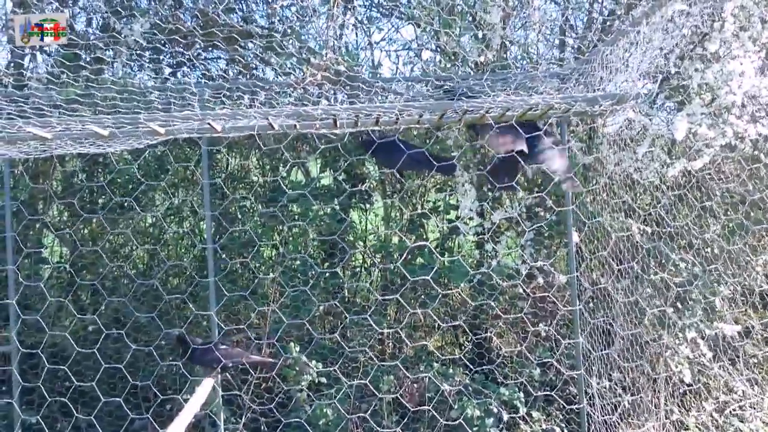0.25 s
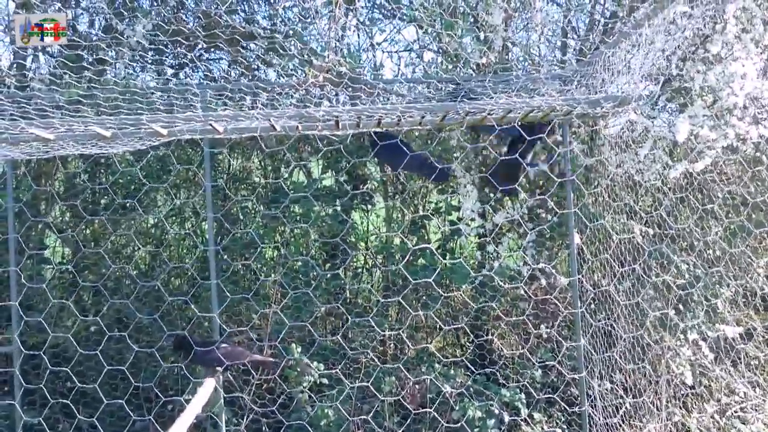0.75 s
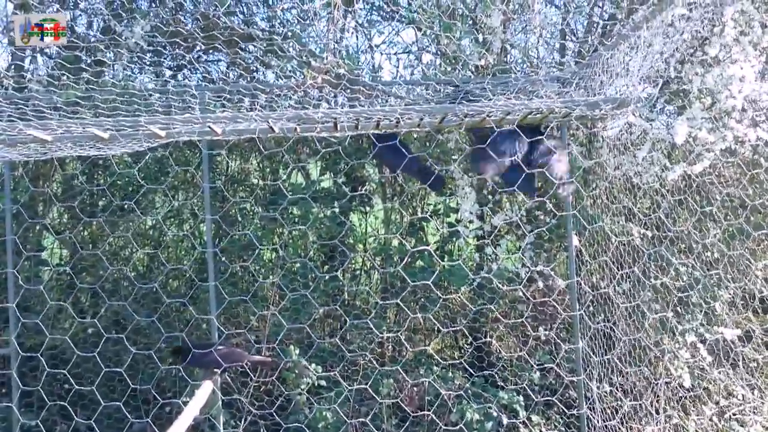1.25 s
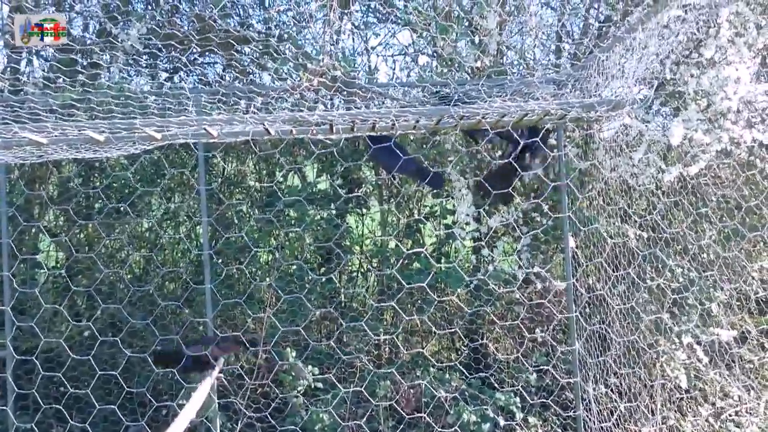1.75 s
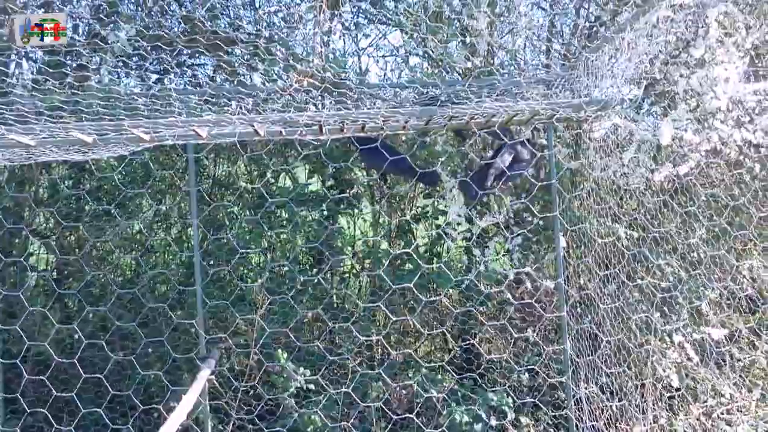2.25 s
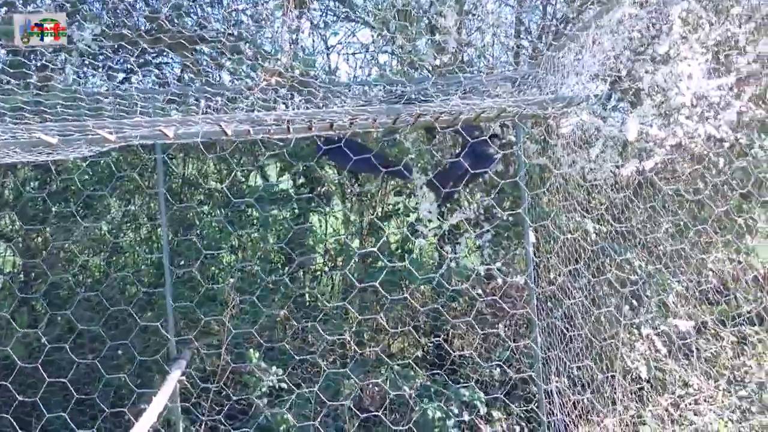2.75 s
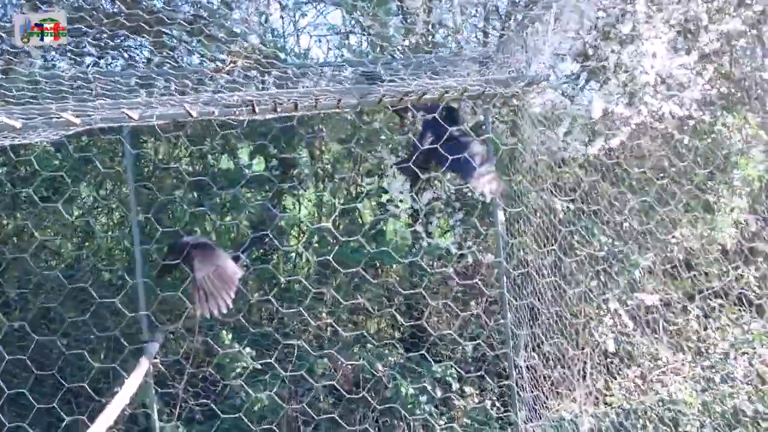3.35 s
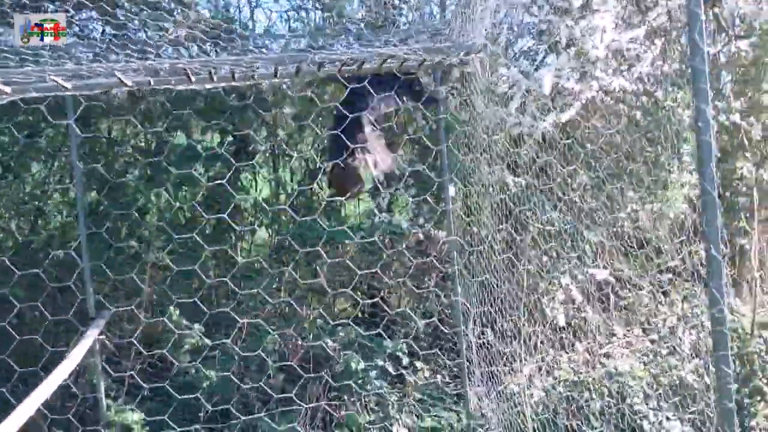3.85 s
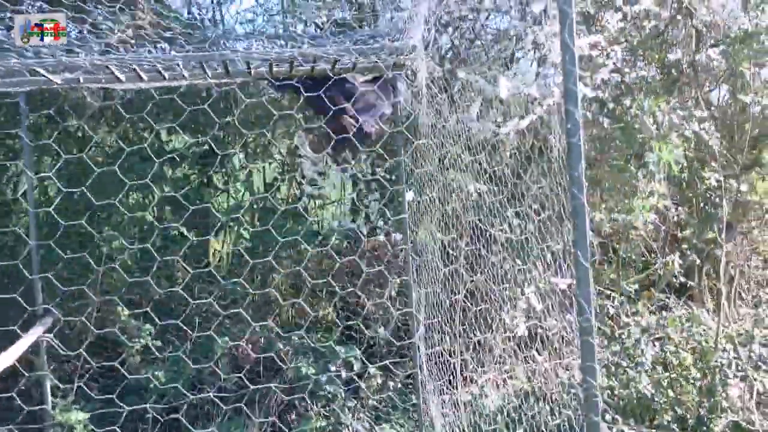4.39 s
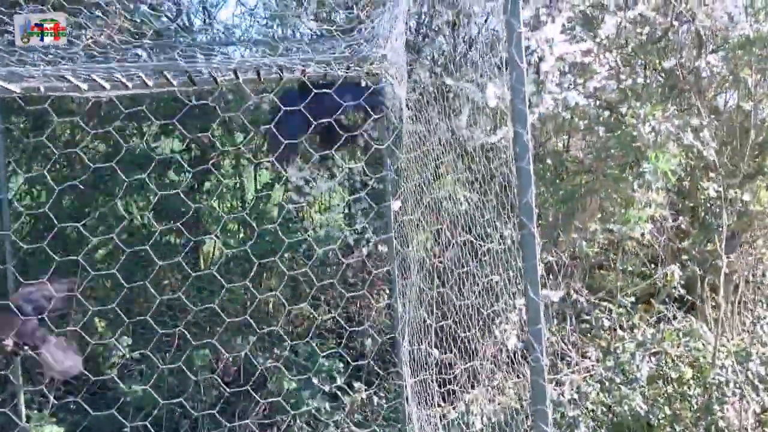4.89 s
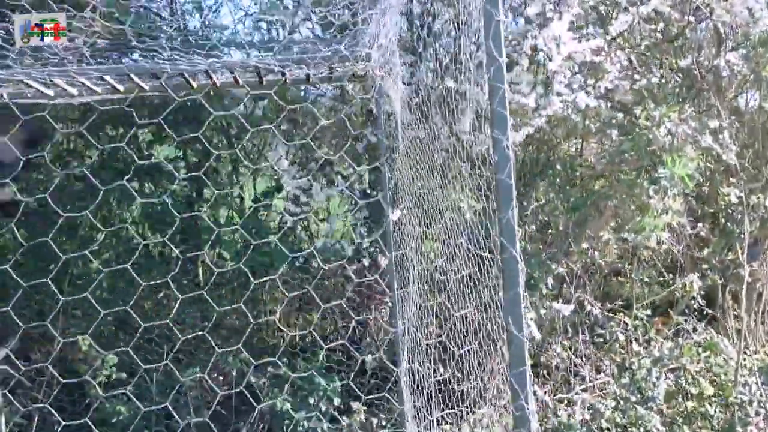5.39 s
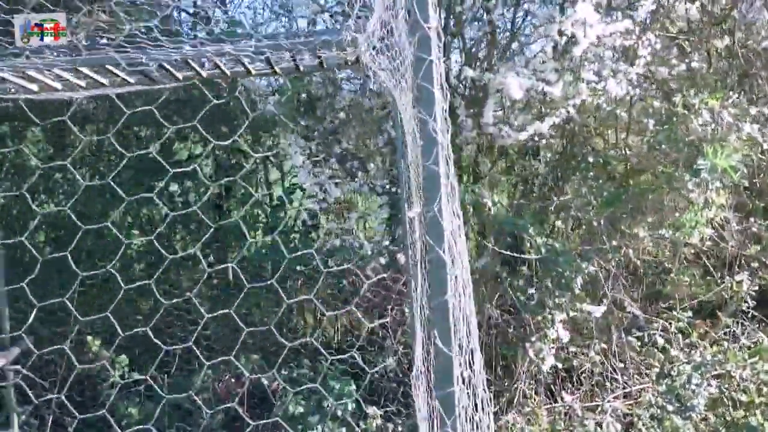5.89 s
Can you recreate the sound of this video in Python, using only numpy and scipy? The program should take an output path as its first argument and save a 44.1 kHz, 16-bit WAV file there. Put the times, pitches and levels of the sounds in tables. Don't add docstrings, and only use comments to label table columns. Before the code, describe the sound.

Outdoors beside a field, crows beat their wings against a wire cage. At first dry, feathery strokes come softly from a bird clinging to the mesh, with small ticks and a thin ping. After a near lull, birds flutter up close with loud swishes, cracks, knocks and ringing wire, peaking late before easing. Stereo microphone, faint leaf hiss and low wind buffets mostly on the right.

```python
import sys
import numpy as np
from scipy import signal
from scipy.fft import rfft, irfft
from scipy.io import wavfile

SR = 44100
rng = np.random.default_rng(int(sys.argv[2]) if len(sys.argv) > 2 else 0)


def ratio_of_db(decibels):
    return 10 ** (np.asarray(decibels, float) / 20)


def file_out(sig):
    cols = np.atleast_2d(sig).T
    lim = np.clip(cols, -1, 1)
    pcm = np.round(lim * 32767).astype(np.int16)
    wavfile.write(sys.argv[1], SR, pcm)


N = 270333

# f/Hz, level/dB per Hz
LEFT_PORT = [(130, -88.5), (340, -88.5), (500, -86.5), (620, -86), (830, -81), (1300, -88), (2200, -86),
             (3600, -81.5), (4650, -87), (6000, -75.5), (8500, -79), (10000, -82.5), (11300, -94),
             (15800, -99.7)]
RIGHT_PORT = [(130, -88), (340, -82.5), (500, -82), (640, -80.5), (860, -76.5), (1300, -79), (2200, -78),
              (3600, -72), (4650, -80.5), (6000, -85), (8500, -86.5), (10000, -95), (11300, -95.5),
              (15800, -88.5)]
PORT_LAG_S = .00022
POLARITY = np.array([[1.], [-1.]])
WIND_SIDES_DB = np.array([[-9], [5]])
SPLIT_HZ = 1750


def rms_one(x):
    return x / np.sqrt(np.mean(x ** 2) + 1e-20)


def pan_gain(db, left_right_db):
    return ratio_of_db(db + left_right_db * np.array([[.5], [-.5]]))


def cut(x, hz, kind, order):
    return signal.sosfilt(signal.butter(order, hz, kind, fs=SR, output="sos"), x)


def at_hz(points, hz):
    points = np.array(points)
    return np.interp(np.log(hz + 1), np.log(points[:, 0]), points[:, 1])


def colour(x, left, right):
    hz = np.arange(2049) * SR / 4096
    cepstrum = irfft(np.log(ratio_of_db(np.array([at_hz(left, hz), at_hz(right, hz)]))))
    cepstrum[:, 1:2048] *= 2
    cepstrum[:, 2049:] = 0
    response = irfft(np.exp(rfft(cepstrum)))[(None,) * (x.ndim - 2)]
    return signal.fftconvolve(x, response, axes=-1)[..., :x.shape[-1]]


def drift(rate):
    r = np.exp(-2 * np.pi * rate / SR)
    return rms_one(signal.lfilter([1], [1, -2 * r, r * r], rng.standard_normal(N + SR))[SR:])


def ring(clicks, hz, t60):
    r, w = ratio_of_db(-60 / (t60 * SR)), 2 * np.pi * hz / SR
    return signal.lfilter([0, np.sin(w)], [1, -2 * r * np.cos(w), r * r], clicks + 1e-18)


def wings(squareness, bed_top_db):
    # t/s, level/dB
    scrabble = [(0, -63), (.78, -72.5), (1.19, -62.5), (1.59, -61.5), (1.74, -64.5), (2.15, -65),
                (2.36, -74), (3.16, -79.5), (3.45, -53.5), (3.84, -49), (4.66, -50), (4.81, -45),
                (4.92, -48), (5.2, -50), (5.34, -42), (5.48, -78), (5.82, -52), (6.13, -52)]
    # t/s, swish level/dB, length/s, low flap against the swish/dB
    far_beats = [(0, -48, 0.026, -10), (0.074, -64, 0.03, 3.5), (0.178, -52.5, 0.054, -8),
                 (.374, -51, 0.052, -7), (0.593, -58, 0.036, -5.5), (0.779, -53.5, 0.052, -9.5),
                 (0.947, -48.5, 0.052, -11.5), (0.971, -48.5, 0.038, -9), (1.06, -62.5, .045, -4),
                 (1.143, -47, 0.062, -10), (1.307, -51, 0.1, -6.5), (1.355, -45.5, 0.066, -10.5),
                 (1.575, -50.5, 0.043, -7), (1.74, -54, 0.045, -24), (1.788, -56.5, 0.061, -4.5),
                 (1.96, -65, 0.072, 4.5), (2.019, -51, 0.072, -3.5), (2.22, -48.5, 0.013, -2),
                 (2.327, -71, 0.028, 3), (2.436, -62, .02, -11), (2.633, -60, 0.046, -4),
                 (2.744, -66.5, .047, -0.5)]
    near_beats = [(3.486, -49, 0.039, -0.5), (3.642, -43, 0.06, -3.5), (3.753, -48, 0.013, 8.5),
                  (3.765, -35.5, 0.015, -3), (3.788, -36, 0.038, -9), (3.805, -38, 0.024, -7),
                  (4.074, -53.5, 0.13, -29), (4.155, -47.5, 0.056, -23), (4.308, -41.5, 0.082, -5),
                  (4.415, -52, 0.075, -8), (4.462, -37, 0.011, -13), (4.638, -45, 0.013, -20),
                  (4.466, -42, 0.059, -10.5), (4.742, -35.5, 0.088, -5), (4.741, -34.5, .012, -11),
                  (4.756, -35.5, 0.021, -2), (4.814, -39.5, 0.012, -6), (4.821, -41.5, 0.052, -8),
                  (4.889, -41.5, .018, -8), (4.907, -42, 0.056, -4.5), (4.962, -41.5, 0.023, -2.5),
                  (5.005, -47, 0.14, -2.5), (5.772, -45, 0.2, -7), (6.06, -48, 0.13, -25),
                  (6.123, -55, 0.016, 4)]
    slaps = [(0.468, -61.5, 0.045, -1.5), (0.925, -52.5, 0.024, -2), (2.183, -50.5, 0.075, -4),
             (2.53, -63.5, 0.077, -1), (3.169, -63, 0.11, -9), (4.585, -47.5, 0.13, -8.5),
             (5.123, -49.5, 0.096, -2.5), (5.317, -41.5, 0.072, -28), (5.419, -39.5, 0.071, -6.5),
             (5.488, -47, 0.045, -1.5), (5.551, -42.5, 0.17, -4), (5.688, -50, 0.1, 2.5),
             (5.97, -62.5, 0.18, 3)]
    bangs = [
        (3.757, -37.5, 0.023, -3),
        (3.949, -37.5, 0.027, -8.5),
        (4.861, -40.5, 0.022, -2.5),
        (4.399, -48.5, .012, 0),
        (4.948, -50, .015, -4),
        (5.2942, -30.5, 0.021, -12),
        (5.3793, -34, 0.025, -8.5),
    ]
    t = np.arange(0, N, 32) / SR
    strokes = np.concatenate([far_beats, near_beats, slaps, bangs])
    s, peak_db, length, flap_db = np.transpose(strokes)[:, :, None]
    kinds = [[.48, .21, .06], [1.6, 1.7, 1.5]]
    counts = [len(far_beats) + len(near_beats), len(slaps), len(bangs)]
    swell, end = np.repeat(kinds, counts, axis=1)[:, :, None]
    side = np.where(t < s, swell * length, (1 - swell) * length)
    distance = np.abs((t - s) / np.maximum(side, .0012))
    bump = ratio_of_db(peak_db - 11.5 * distance ** np.where(t < s, squareness, end)) ** 2
    bed_db = np.interp(np.arange(N) / SR, *np.transpose(scrabble))

    def level(power, floor_db):
        return np.sqrt(np.interp(np.arange(N) / SR, t, power.sum(0)) + ratio_of_db(floor_db) ** 2)

    flap, swish, top = feathers(per_s=10000, spread_db=3.0, cycles=9.5, hiss=.42, patchy_db=2.4)
    flap = flap * level(bump * ratio_of_db(flap_db) ** 2, bed_db - 6.5)
    swish_level = level(bump, bed_db - 2.5)
    return flap + swish * swish_level + top * level(bump, bed_db + bed_top_db), swish_level


def feathers(per_s, spread_db, cycles, hiss, patchy_db):
    lag_spread_s, top_hz, pitch_count = .00013, 10600, 64
    chance = rng.random((N, 2))
    lag = (PORT_LAG_S + lag_spread_s * rng.standard_normal(N)) * SR
    lag = np.clip(lag, -40, 60).astype(int)
    sizes = ratio_of_db(spread_db * np.minimum(rng.exponential(1, N), 3)) * rng.choice([-1, 1], N)
    born = np.flatnonzero(chance[100:-100, 0] < per_s / SR) + 100
    pitch_of = (chance[born, 1] * pitch_count).astype(int)
    pitches = np.geomspace(200, 15500, pitch_count) * rng.uniform(.98, 1.02, pitch_count)
    patches = [ratio_of_db(patchy_db * drift(25.0)) for _ in range(8)]
    barbs = np.zeros((2, N))
    for k, hz in enumerate(pitches):
        at, clicks = born[pitch_of == k], np.zeros((2, N))
        clicks[0, at] = sizes[at] * patches[k // 8][at]
        clicks[1, at + lag[at]] = -clicks[0, at]
        barbs += ring(clicks, hz, cycles * hz ** -.75) * hz ** 0.78
    air = rng.standard_normal((2, N))
    shared = cut(air[0], 2440, "low", order=2)
    air[1] = cut(air[1], 1500, "high", order=2) - np.roll(shared, int(PORT_LAG_S * SR))
    both = np.sqrt(1 - hiss) * rms_one(barbs) + np.sqrt(hiss) * air * ratio_of_db(1.8 * drift(88))
    both = colour(both, LEFT_PORT, RIGHT_PORT)
    flap = rms_one(cut(both, SPLIT_HZ, "low", order=3))
    swish = rms_one(cut(both, SPLIT_HZ, "high", order=3))
    return flap, cut(swish, top_hz, "low", order=4), cut(swish, top_hz, "high", order=4)


def ticks(level, per_s, level_db):
    sizes = ratio_of_db(5.6 * np.minimum(rng.exponential(1, N), 3)) * rng.choice([-1, 1], N)
    clicks = (rng.random(N) < per_s / SR) * sizes
    clicks = np.array([clicks, -np.roll(clicks, int(PORT_LAG_S * SR))])
    clicks = cut(colour(clicks, LEFT_PORT, RIGHT_PORT), SPLIT_HZ, "high", order=2)
    return rms_one(clicks) * level * ratio_of_db(level_db)


def wire(taps, level_db, spread, t60_s, share):
    out, t = np.zeros((2, N + 4096)), np.arange(4000) / SR
    noise, lag = rng.standard_normal((len(taps), 2, len(t))), int(PORT_LAG_S * SR)
    for (s, peak_db, hz, pan_db), crack in zip(taps, noise):
        t60 = t60_s * (1000 / hz) ** 0.12
        crack = crack * ratio_of_db(-60 * t / np.maximum(t60 * 1.2, .001)) * np.minimum(t * hz / 0.72, 1)
        contact = crack[0] * (t < 4.0 / hz + .001)
        crack = cut(crack, min(17.0 * hz, 18000), "low", order=1)
        rung = sum(ring(contact, hz * (1 + spread) ** k, t60) * 0.11 ** abs(k) for k in (-1, 0, 1))
        parts = np.array([rung * POLARITY, cut(crack, 510, "high", order=2)])
        rung, crack = [part / np.abs(part).max() for part in colour(parts, LEFT_PORT, RIGHT_PORT)]
        tap = (share * rung + (1 - share) * crack) * pan_gain(peak_db + level_db, pan_db)
        at = round(s * SR)
        out[0, at:at + len(t)] += tap[0]
        out[1, at + lag:at + lag + len(t)] += tap[1]
    return out[:, :N]


def claws():
    # t/s, peak/dB, ring f/Hz, left-right/dB
    cracks = [(.926, -29, 6570, 1), (2.524, -34.5, 3380, 2), (2.628, -35.5, 1630, 1),
              (3.463, -36, 1190, -12), (3.754, -24, 1710, 0), (3.765, -27, 3150, -9),
              (4.081, -26, 910, -3.5), (4.177, -24, 3700, -3.5), (4.407, -26, 3880, -5),
              (4.439, -40, 3340, -6), (4.46, -37, 3560, 12), (4.754, -17, 3700, -12),
              (4.946, -27, 1210, 12), (5.25, -22, 3220, -5), (5.295, -17, 1140, 2.5),
              (5.348, -29, 5850, -1), (5.382, -24, 7100, -14), (5.64, -32, 966, -4), (5.718, -23, 3070, 0),
              (5.765, -23.5, 2980, -4)]
    return wire(cracks, level_db=-5, spread=0.25, t60_s=0.025, share=0.22)


def knocks():
    # t/s, peak/dB, ring f/Hz, left-right/dB
    panel_hits = [(1.564, -37.5, 830, -2.5), (3.481, -34, 1580, -1), (3.6, -30, 1700, -4),
                  (3.694, -39, 1670, -13), (3.878, -27.5, 910, -1.5), (4.21, -34.5, 1160, -12.5),
                  (4.689, -28.5, 903, -4), (4.862, -30, 1610, 11), (3.849, -39, 1000, -2),
                  (3.764, -24, 1500, -2), (4.749, -22, 900, -4), (5.018, -29, 1240, -3),
                  (5.022, -29, 1740, -6), (5.024, -29, 1250, -6), (5.035, -32, 1160, -2),
                  (5.054, -32, 1160, -6), (5.381, -21.5, 1990, 3), (5.533, -25, 886, 0),
                  (5.605, -20.5, 410, 0), (5.619, -22.5, 1310, -4), (5.675, -19, 1175, 6)]
    return wire(panel_hits, level_db=-4, spread=0.19, t60_s=0.031, share=0.53)


def pecks():
    # t/s, peak/dB, ring f/Hz, left-right/dB
    beak_taps = [(.157, -34, 3380, -4), (.754, -42, 2970, -8), (1.052, -37, 3100, -11),
                 (1.118, -33, 6330, 11), (1.721, -35.5, 6000, 10), (1.998, -37, 3420, -1),
                 (3.636, -27, 3900, -12), (3.787, -30, 3300, .5), (3.845, -38, 2980, -4),
                 (3.953, -27, 6300, 13), (3.955, -28, 2520, -4), (4.304, -18.5, 2960, 0),
                 (4.409, -32, 3900, -4), (4.397, -27.5, 3960, -9), (4.568, -22, 3640, 2),
                 (4.705, -26, 3600, -9), (4.725, -14, 2950, -8), (5.119, -32, 3780, -18),
                 (5.789, -29, 3120, -4), (4.713, -26, 3450, -4), (4.738, -19, 3180, -4),
                 (4.761, -22, 3400, -4), (5.932, -26, 2890, 4), (5.978, -30, 3400, -4)]
    return wire(beak_taps, level_db=-7, spread=0.13, t60_s=0.043, share=0.36)


def thumps():
    # t/s, peak/dB, ring f/Hz, left-right/dB
    air_pushes = [(1.794, -62, 278, 4), (2.672, -62, 340, -4), (3.459, -47.5, 380, -3.5),
                  (3.77, -39.5, 327, -2), (3.879, -50.5, 250, -10), (4.017, -53.5, 312, -3),
                  (4.172, -41.5, 450, -2.5), (4.309, -56, 432, -15), (4.751, -64, 354, -8),
                  (5.112, -43.5, 300, -2), (5.291, -60, 278, 18), (5.857, -55.5, 503, -11)]
    return wire(air_pushes, level_db=6.5, spread=0.33, t60_s=0.033, share=0.7)


def booms():
    # t/s, peak/dB, ring f/Hz, left-right/dB
    blows = [
        (.649, -47.5, 1140, 6),
        (2.171, -39.5, 1150, 0),
        (3.599, -36.5, 900, -3),
        (3.604, -33, 1100, -2),
        (5.015, -34, 1000, 2),
        (5.029, -35, 1850, -1.5),
        (5.295, -24, 1042, 1),
    ]
    return wire(blows, level_db=3.5, spread=0.14, t60_s=0.024, share=0.8)


def pings():
    # t/s, peak/dB, ring f/Hz, left-right/dB
    strands = [
        (1.6, -61, 7700, 0),
        (1.733, -32, 4870, 8),
        (1.742, -36, 5400, 8),
        (1.737, -39, 6000, 8),
        (1.75, -36, 5050, -4),
        (3.1675, -49.5, 10500, 18),
        (4.5, -48, 4900, -2),
        (5.803, -46, 6800, 0),
        (6.02, -54, 15000, -3),
    ]
    return wire(strands, level_db=-6.0, spread=0.018, t60_s=0.074, share=0.83)


def snaps(table, t60_s, ring_share):
    out, t = np.zeros((2, N + 2048)), np.arange(1500)
    click = cut(colour((t == 0) * POLARITY, LEFT_PORT, RIGHT_PORT), 750, "high", order=2)
    for s, peak_db, hz, pan_db in table:
        rung = ring(click, hz, t60_s) + ring(click, 1.38 * hz, t60_s)
        body = cut(click + ring_share * np.sqrt(4000 / hz) * rung, .3 * hz, "high", order=2)
        snap = cut(body, min(hz ** 2 / 1450 + 600, 19000), "low", order=3)
        snap = snap / np.abs(snap).max() * pan_gain(peak_db, pan_db)
        for port, lag in enumerate((0, PORT_LAG_S)):
            at = round((s + lag) * SR)
            out[port, at:at + len(t)] += snap[port]
    return out[:, :N]


def claw_slips():
    # t/s, peak/dB, ring f/Hz, left-right/dB
    slips = [(.6485, -38, 7300, 22.5), (.6486, -46, 13000, 10), (5.2947, -31, 13000, 3),
             (5.3495, -30, 13000, 6), (5.3804, -31, 13000, 3), (5.385, -30, 7500, 3),
             (1.7943, -37.5, 3600, -9), (3.483, -35.5, 8900, 19), (3.7649, -23, 6760, 5),
             (4.0817, -38, 8700, 11), (4.7546, -23, 6300, 3), (5.0701, -21.5, 2230, -3.5),
             (5.2945, -18.5, 9400, 7), (5.3494, -20, 8500, 4), (5.3806, -25, 7000, 0),
             (5.385, -24.5, 3540, -9), (5.642, -29.5, 9200, 4), (5.899, -41, 7000, 0)]
    return snaps(slips, t60_s=0.0046, ring_share=0.095)


def quill_catches():
    # t/s, peak/dB, ring f/Hz, left-right/dB
    catches = [(.0762, -43, 3010, -8), (.1613, -46, 2920, 0), (.3756, -38, 2840, 6), (.6776, -48, 3870, 2),
               (.756, -45, 2920, 0), (.923, -44, 3100, 6), (1.1475, -38, 3700, 3), (1.3429, -36, 3530, 3),
               (1.3466, -42, 1470, 6), (1.3735, -34, 2750, -4), (1.5824, -47, 3440, 3),
               (1.7239, -40, 4820, 3), (1.7966, -42, 3350, -3), (2.2044, -39, 6020, 7),
               (2.3251, -47, 8000, 10), (2.528, -46, 1890, 0), (2.7434, -52, 2670, 6),
               (2.984, -49, 7500, 3), (3.0916, -53, 6970, 6), (3.424, -41, 1120, 0), (3.5871, -46, 9030, 3),
               (3.7538, -22, 9100, 7), (3.756, -25, 6000, 2), (3.7573, -26, 5800, 0),
               (3.7683, -31, 3300, 4), (3.7887, -25, 3350, 6), (3.9116, -36, 6620, 3),
               (3.9504, -24, 6190, 3), (4.0862, -31, 2320, -4), (4.1792, -33, 2340, -5),
               (4.2352, -29.5, 6360, 3), (4.2995, -28, 3000, 0), (4.4398, -32, 3180, 3),
               (4.4505, -28, 6620, 0), (4.4615, -34, 5330, 7), (4.5825, -34, 1810, 6),
               (4.7259, -25, 1000, 0), (4.8152, -32, 3400, 3), (4.8643, -30, 6710, 7),
               (4.8865, -29, 8000, 5), (4.8985, -33, 7000, 3), (4.9058, -34, 8000, 5),
               (4.9478, -38, 5760, 0), (5.056, -34, 1300, 5), (5.4922, -31.5, 1470, -3),
               (5.6051, -28, 7570, 13), (5.6738, -33, 7000, 0), (5.7193, -35, 1460, -2),
               (5.9376, -35, 5500, 3), (6.1259, -34, 1630, -3)]
    return snaps(catches, t60_s=0.01, ring_share=0.029)


def squeaks():
    # t/s, peak/dB, f/Hz, length/s, left-right/dB
    slides = [
        (5.811, -43, 5480, 0.037, 6),
        (5.808, -54, 6200, .016, 6),
        (5.828, -54, 5200, 0.019, 11),
        (5.022, -33, 1374, .014, -10),
        (5.417, -45, 6050, .022, 6),
    ]
    out = np.zeros((2, N))
    for s, peak_db, hz, length, pan_db in slides:
        t = np.arange(int(length * SR)) / SR
        waver = .5 * np.sin(2 * np.pi * 90 * t)
        tone = np.sin(2 * np.pi * hz * (t + [[PORT_LAG_S], [0]]) + waver)
        tone = tone * np.sin(np.pi * t / length) ** 2
        at = int((s - length / 2) * SR)
        out[:, at:at + len(t)] += tone * pan_gain(peak_db, pan_db) * POLARITY
    return out


def wind():
    # t/s, level/dB, length/s
    puffs = [(0.176, -65, .13), (0.58, -62, 0.14), (.66, -66, .08), (.79, -68.5, .08), (3.13, -69, 0.071),
             (1.8, -74, .15), (0.645, -67.5, 0.54), (0.837, -74, .1), (1.06, -68, 0.11),
             (1.182, -66, 0.068), (1.377, -68, 0.39), (1.44, -60.5, 0.081), (1.538, -68, .1),
             (1.888, -66, 0.15), (2.103, -66, .1), (2.247, -64.5, 0.13), (2.387, -67, 0.26),
             (2.464, -66, 0.081), (2.64, -64.5, 0.066), (2.718, -66, .08), (2.846, -68, 0.28),
             (2.96, -65, 0.086), (3.158, -81, .1), (3.3, -67.5, .3), (3.45, -63, 0.092), (3.762, -64, .12),
             (3.876, -64, 0.16), (4.32, -80, 0.23), (4.6, -78, 0.16), (4.733, -70, .1), (4.983, -58, 0.17),
             (5.332, -60.5, 0.15), (5.417, -70.5, .4), (5.99, -86, .3)]
    calm_db, puff_fall_db = -85, 20.5
    eddies = ring(rng.standard_normal((2, N)), 65, .07) * ratio_of_db(1.5 * drift(14))
    eddies = rms_one(cut(cut(eddies, 53, "high", order=2), 180, "low", order=2))
    t = np.arange(0, N, 64) / SR
    s, peak_db, length = np.transpose(puffs)[:, :, None]
    puff = ratio_of_db(peak_db - puff_fall_db * np.abs(t - s) * 2 / length)
    power = ratio_of_db(calm_db) ** 2 + (puff ** 2).sum(0)
    return eddies * np.interp(np.arange(N) / SR, t, np.sqrt(power)) * ratio_of_db(WIND_SIDES_DB)


def jolts():
    # t/s, peak/dB
    pushes = [(.551, -59), (1.41, -63), (1.46, -63), (1.53, -65), (2.845, -64), (1.855, -63),
              (1.903, -50.5), (2.142, -54), (2.462, -60), (2.617, -58), (2.914, -52)]
    s, peak_db = np.transpose(pushes)
    push = np.zeros(N)
    push[(s * SR).astype(int)] = ratio_of_db(peak_db)
    throb = ring(push, 71, 0.061) + 0.48 * ring(push, 97, .03)
    return cut(throb, 240, "low", order=2) * ratio_of_db(WIND_SIDES_DB)


def field():
    # f/Hz, level/dB per Hz
    left_air = [(60, -103), (480, -101), (1300, -101), (4600, -111), (6000, -104), (8500, -107.5),
                (11300, -117.5), (15800, -114.5)]
    right_air = [(60, -99), (480, -102), (1300, -101.5), (3600, -102), (4800, -108.5), (8500, -111.5),
                 (11000, -118), (15800, -114)]
    sway = ratio_of_db(.7 * drift(3))
    hiss = colour(rng.standard_normal((2, N)), left_air, right_air)
    return hiss * np.sqrt(SR / 2) * ratio_of_db(1.0) * sway


def scene():
    beats, bustle = wings(squareness=2.8, bed_top_db=-6.5)
    beats = beats + ticks(bustle, per_s=300, level_db=-11.0)
    hits = claws() + knocks() + pecks() + thumps() + booms() + pings()
    strands = claw_slips() + quill_catches() + squeaks()
    return beats + hits + strands + wind() + jolts() + field()


def low_pass(x):
    return signal.sosfilt(signal.butter(12, 17010, fs=SR, output="sos"), x)


def record(dry):
    top_cut = signal.cheby2(16, 45, 16080, fs=SR, output="sos")
    mix = signal.sosfilt(top_cut, cut(dry, 45, "high", order=2)) - .0002
    return low_pass(mix)


dry = scene()
out = record(dry)
file_out(out)
```